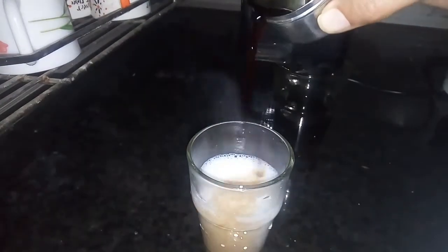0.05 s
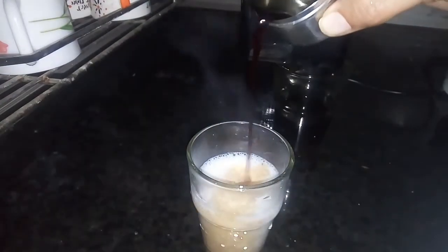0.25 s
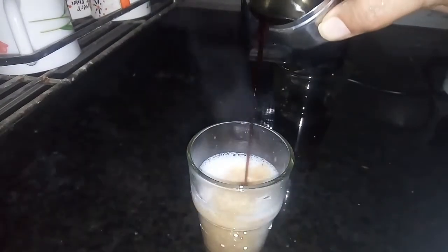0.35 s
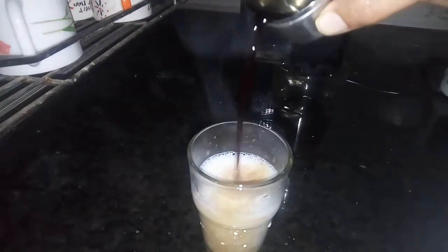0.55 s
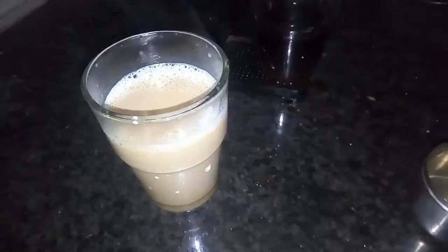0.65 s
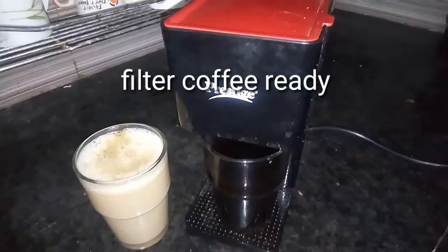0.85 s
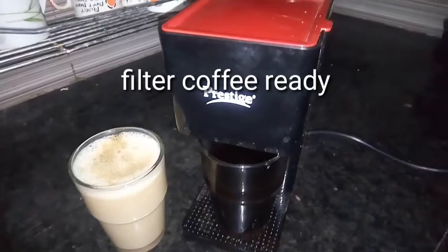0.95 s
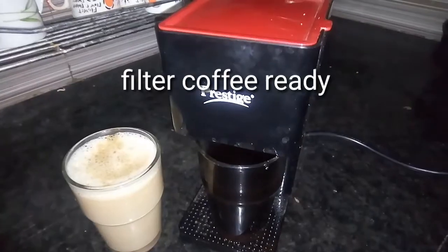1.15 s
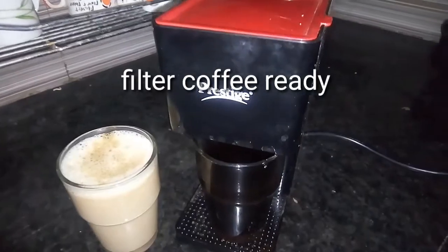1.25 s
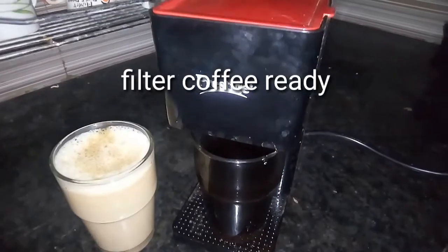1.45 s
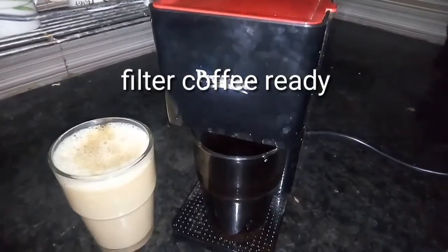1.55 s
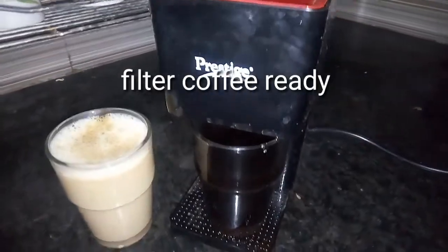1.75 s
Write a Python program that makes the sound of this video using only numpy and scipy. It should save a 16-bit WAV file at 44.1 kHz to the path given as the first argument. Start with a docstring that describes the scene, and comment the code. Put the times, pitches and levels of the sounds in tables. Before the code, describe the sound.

Coffee pours in a thin stream into a glass of milk, close and to the right, with splashing drops, bubbly plinks and a hollow gurgle. The sharpest plink comes at 0.5 seconds. At about 0.9 seconds the pour cuts off abruptly. The quiet kitchen holds a faint appliance hum while a small bird chirps softly outside. Near 1.7 seconds come one distant crow caw and a slight handling rumble.

```python
"""Coffee poured into milk

A thin stream of coffee falls into a glass of milk on a kitchen counter, close to the right microphone.
Drops slap the surface and trap bubbles, which ring the air in the glass and the kitchen. The pour cuts
off abruptly, leaving a faint appliance hum, a small bird chirping outside and one hoarse, far crow."""
import sys
import numpy as np
from scipy import signal
from scipy.fft import rfft, irfft
from scipy.io import wavfile
from scipy.ndimage import uniform_filter1d

SR = 44100
rng = np.random.default_rng(int(sys.argv[2]) if len(sys.argv) > 2 else 0)


def bounce(signal):
    """Save signal as a 16-bit WAV file at the path given by the first command-line argument."""
    frames = np.transpose(np.atleast_2d(signal))
    limited = np.clip(frames, -1, 1)
    pcm = np.round(limited * 32767).astype(np.int16)
    wavfile.write(sys.argv[1], SR, pcm)


N = 79380
TIME = np.arange(N) / SR
CUT_S = .865  # the pour stops here


def undb(db):
    """Decibels to gain."""
    return 10 ** (np.asarray(db, float) / 20)


def unit(x):
    """Scale to rms 1."""
    return x / np.sqrt(np.mean(x ** 2))


def curve(rows):
    """A fader move: gain over time through (seconds, dB) points."""
    return undb(np.interp(TIME, *np.array(rows).T))


def colour(x, points):
    """A minimum-phase EQ through (Hz, dB) points."""
    size = 2 * N
    hz, db = np.array(points, float).T
    freqs = np.maximum(np.arange(N + 1) * SR / size, 1)
    gain = undb(np.interp(np.log(freqs), np.log(hz), db))
    cepstrum = irfft(np.log(gain))
    cepstrum[1:N] *= 2  # folded forward, so nothing rings ahead of a hit
    cepstrum[N + 1:] = 0
    return irfft(rfft(x, size) * np.exp(rfft(cepstrum)))[..., :N]


def band(x, hz, width):
    """One broad resonance, at rms 1."""
    edges = [hz - width / 2, hz + width / 2]
    return unit(signal.sosfilt(signal.butter(2, edges, "bandpass", fs=SR, output="sos"), x))


def fade(t, t60):
    """Exponential decay, 60 dB down at t60."""
    return np.exp(-np.log(1000) * t / t60)


def convolve(x, response):
    """Play x through an impulse response."""
    return signal.fftconvolve(x, response)[:N]


def tail(t60):
    """Diffuse echoes of unit energy."""
    echoes = rng.standard_normal(N) * fade(TIME, t60) * (1 - np.exp(-TIME / .0029))
    return echoes / np.sqrt(np.sum(echoes ** 2))


def add(out, start, sound):
    """Mix a sound in at its start in seconds."""
    i = int(np.clip(start * SR, 0, N - 1))
    out[i:i + len(sound)] += sound[:N - i]


def wander(per_s):
    """Smooth random drift at rms 1."""
    hold = int(SR / per_s)
    steps = np.repeat(rng.standard_normal(N // hold + 1), hold)
    return unit(uniform_filter1d(uniform_filter1d(steps, hold), hold)[:N])


# EQ of the room tone. Each row: frequency in Hz, gain in dB.
ROOM_TONE_EQ = [(25, -22), (45, -7), (85, 3), (170, -6.5), (350, -5), (560, -10.5), (850, -12),
                (1300, -20.5), (2000, -21), (3900, -25), (5800, -26), (8000, -33), (13500, -36),
                (15400, -32.5)]


def room_tone():
    """A soft bed of noise, narrower in stereo below about 700 Hz."""
    mid, side = unit(colour(rng.standard_normal((2, N)), ROOM_TONE_EQ))
    side = side - .61 * signal.sosfilt(signal.butter(1, 701.5, fs=SR, output="sos"), side)
    level = undb(-75) * curve([(0, -1), (.8, 0), (.9, 2), (1.2, 2.5), (1.8, 2)])
    return level * np.array([mid + side, mid - side])


# Fader of the low room noise. Each row: time in seconds, level in dB.
DRONE_FADER = [(0, -85), (.8, -85), (.88, -72), (1., -76), (1.08, -90), (1.8, -100)]


def drone():
    """A low band of room noise that swells briefly as the pour ends."""
    sides = [band(rng.standard_normal(N), hz=390, width=250) for _ in range(2)]
    return np.array(sides) * curve(DRONE_FADER)


# Tones of the appliance. Each row: pitch in Hz, level in dB before the fader.
HUM_TONES = [(100, -85), (255, -93), (298, -83.5), (376, -84), (555, -90), (615, -86)]
# The tones grow as the microphone nears the appliance. Each row: time in seconds, gain in dB.
HUM_FADER = [(0, -17.5), (.85, -9.5), (1.05, 0), (1.8, -3)]


def appliance_hum():
    """Wavering tones over a deep mains hum and a motor note, a touch to the right."""
    def tone(hz):
        phase = 2 * np.pi * np.cumsum(hz + .56 * wander(8)) / SR
        return np.sqrt(2) * np.sin(phase) * undb(2 * wander(3.7))

    tones = curve(HUM_FADER) * sum(undb(db) * tone(hz) for hz, db in HUM_TONES)
    mains = tone(hz=49.8) * curve([(0, -83), (.75, -79.5), (.85, -70.5), (1, -68),
                                   (1.08, -80.5), (1.8, -76)])
    motor = tone(hz=81) * curve([(0, -92.5), (1, -93.5), (1.1, -76), (1.35, -80.5),
                                 (1.5, -80.5), (1.65, -81.5), (1.72, -71), (1.8, -80)])
    return (tones + mains + motor) * undb([[-.8], [.8]])


# Fader of the hand rumble. Each row: time in seconds, level in dB.
HANDLING_FADER = [(0, -94.5), (1.62, -94), (1.68, -73), (1.73, -70), (1.8, -76)]
# Its dull tone. Each row: frequency in Hz, gain in dB.
HANDLING_EQ = [(30, -13), (70, -4), (150, -7), (260, -3.5), (450, -24), (1500, -49)]


def handling():
    """A soft rumble as the hand holding the microphones shifts."""
    return unit(colour(rng.standard_normal(N), HANDLING_EQ)) * curve(HANDLING_FADER)


def yard(x):
    """Echoes outside smear a far sound, placed a little to the left."""
    smeared = np.array([x + convolve(x, tail(t60=.11)) for _ in range(2)])
    return smeared * undb([[1.5], [-1.5]])


# Shape of the caw. Each row: time in seconds, level in dB.
CROW_FADER = [(1.65, -94.5), (1.675, -73), (1.722, -64.5), (1.745, -68.5), (1.8, -72)]


def crow():
    """One hoarse call: rough pulses of noise in a single throat resonance."""
    pulse_hz = 132.2 * (1 + .04 * wander(44))
    pulses = 1 + .95 * np.sin(2 * np.pi * np.cumsum(pulse_hz) / SR)
    caw = band(rng.standard_normal(N) * pulses, hz=1454, width=290)
    return yard(caw * curve(CROW_FADER))


# The bird's phrase. Each row: start in seconds, level in dB.
CHIRPS = [(0.931, -76.5), (1.034, -67.5), (1.15, -66.5), (1.265, -67.5), (1.384, -69), (1.504, -67.5),
          (1.618, -71.5), (1.739, -69)]
# Layers of every chirp. Each row: pitch in Hz, delay in seconds, length in seconds, gain in dB,
# gain of the octave above in dB, roughness as a share of the pitch.
CHIRP_VOICES = [(2290, .003, 0.025, 0, -29, 0.03), (2207, 0.015, 0.067, -4.5, -34, 0.02),
                (2990, 0.014, 0.036, -7.5, -11.5, 0.04), (2590, 0.029, 0.037, -8.5, -14, .06)]


def bird():
    """A run of like chirps, each made of overlapping, slightly rising whistles with a raspy edge."""
    out = np.zeros(N)
    for hz, delay, length, db, octave_db, roughness in CHIRP_VOICES:
        along = np.linspace(0, 1, int(length * SR))
        glide_hz = hz * (1 + .033 * (along - .5))
        rasp = 1 + roughness * wander(590)
        for start, chirp_db in CHIRPS:
            pitch = glide_hz * np.roll(rasp, -int(start * SR))[:len(along)]
            phase = 2 * np.pi * np.cumsum(pitch) / SR
            whistle = np.sin(phase) + undb(octave_db) * np.sin(2 * phase)
            add(out, start + delay, undb(chirp_db + db) * np.sin(np.pi * along) * whistle)
    return yard(out)


# EQ of the kitchen's echoes. Each row: frequency in Hz, gain in dB.
ECHO_EQ = [(300, -17), (700, 4), (1700, 4), (3000, 1), (4200, -1.5), (6500, 1.5), (8200, -3), (11000, 1.5),
           (15000, -2.5)]
# Shading of the left microphone. Each row: frequency in Hz, gain in dB.
LEFT_SHADE_EQ = [(500, -15), (1200, -15.5), (2000, -16), (2800, -13), (4000, -21.5), (8000, -25.5),
                 (14000, -8.5)]
LEFT_LAG_S = .00013
COUNTER_DB, WALLS_DB = (4, -10), (-15.5, -15)  # echo sends, left and right


def kitchen(x):
    """The counter answers at once, the walls after it; the left microphone is shaded and later."""
    send = colour(x, ECHO_EQ)
    left, right = (x + undb(db) * convolve(send, tail(t60=.022)) for db in COUNTER_DB)
    left = np.interp(TIME - LEFT_LAG_S, TIME, colour(left, LEFT_SHADE_EQ))
    walls = np.array([undb(db) * convolve(send, tail(t60=.25)) for db in WALLS_DB])
    return np.array([left, right]) + walls


BUBBLE_ATTACK_S = .00034
BUBBLE_RISE, RISE_SPREAD = .067, .09  # share of the pitch gained over one ring, and its scatter


def bubble(hz, t60, attack):
    """Trapped air rings as a damped sine that swells quickly and mostly rises in pitch."""
    t = np.arange(int(t60 * SR) + 2) / SR
    envelope = (1 - np.exp(-t / attack)) ** 2 * fade(t, t60)
    rise = BUBBLE_RISE + RISE_SPREAD * rng.uniform(-1, 1)
    return envelope / envelope.max() * np.sin(2 * np.pi * hz * t * (1 + rise * t / t60 / 2))


# Strength of the stream. Each row: time in seconds, gain in dB.
FLOW_FADER = [(0, -0.5), (.05, -22), (.1, -23), (.14, -16.5), (.2, -7), (.24, 2), (.35, -3.5), (.43, -7),
              (.53, -6.5), (.61, -7.5), (.67, -12), (.76, -3.5), (.8, -7), (.86, 3)]
# Balance of the small bubbles. Each row: pitch in Hz, gain in dB.
FIZZ_BALANCE = [(850, -12.5), (1250, -12.5), (1800, 2), (2900, -2.5), (4000, 4), (5000, -1), (7000, 1.5),
                (9500, -7.5)]
# EQ of the spray. Each row: frequency in Hz, gain in dB.
SPRAY_EQ = [(600, -14.5), (1800, 0.5), (4000, 2), (7000, -1), (9500, -8.5), (11500, -18), (13500, -15),
            (15200, -6.5)]
FIZZ_COUNT, FIZZ_DB, FIZZ_SPREAD_DB, FIZZ_RING_CYCLES = 800, -43.5, 7, 26
SPRAY_PER_S, SPRAY_DB = 260, -59


def fizz():
    """Many small bubbles of random size and fine ticks of spray, both following the stream."""
    bubbles = np.zeros(N)
    ticks = (rng.random(N) < SPRAY_PER_S / SR) * rng.standard_normal(N)
    hz, db = np.array(FIZZ_BALANCE, float).T
    for when, smallness, strength in rng.random((FIZZ_COUNT, 3)):
        pitch = hz[0] * (hz[-1] / hz[0]) ** smallness
        gain = undb(FIZZ_DB + np.interp(pitch, hz, db) + FIZZ_SPREAD_DB * (2 * strength - 1.5))
        add(bubbles, when * CUT_S, gain * bubble(pitch, FIZZ_RING_CYCLES / pitch, BUBBLE_ATTACK_S / 2))
    spray = undb(SPRAY_DB) * unit(colour(ticks, SPRAY_EQ))
    return (bubbles + spray) * curve(FLOW_FADER)


# Path of the hollow gurgle. Each row: time in seconds, pitch in Hz, level in dB.
GURGLE_PATH = [(.22, 717.6, -118), (0.241, 714, -56.5), (0.302, 702.3, -58), (0.358, 652.5, -48.5),
               (.42, 615, -50), (.46, 660.7, -54), (0.541, 741.6, -58.5), (0.601, 840, -67),
               (0.641, 980, -84), (.69, 1070, -70), (.76, 1150, -59), (.8, 1200, -61.5)]
GURGLE_PUSHES_PER_S = 330


def gurgle():
    """Random pushes ring the dent that the stream makes in the milk; its pitch sinks, then rises."""
    times, hz, db = np.array(GURGLE_PATH).T
    pushes = (rng.random(N) < GURGLE_PUSHES_PER_S / SR) * np.exp(2j * np.pi * rng.random(N))
    envelope = fade(TIME, t60=.032) * (1 - np.exp(-TIME / BUBBLE_ATTACK_S / 2))
    phase = 2 * np.pi * np.cumsum(np.interp(TIME, times, hz)) / SR
    ring = np.real(convolve(pushes, envelope) * np.exp(1j * phase))
    return unit(ring) * undb(np.interp(TIME, times, db))


# Resonances of the glass. Each row: pitch in Hz, gain in dB, ring time (t60) in seconds.
GLASS_MODES = [(633, -13, 0.072), (1118, -22.5, 0.053), (1279, -12.5, 0.13), (1642, -2.5, 0.054),
               (2060, -3, 0.04), (2615, -16, 0.024), (3280, -24, 0.27), (3465, -20, .07),
               (3724, -17.5, 0.085), (4000, -23.5, 0.058)]


def glass(drive):
    """The air in the glass and its wall ring as damped sines when pushed."""
    modes = (undb(db) * fade(TIME, t60) * np.sin(2 * np.pi * hz * TIME) for hz, db, t60 in GLASS_MODES)
    return convolve(drive, sum(modes) / 2)


# Drops hitting the milk. Each row: start in seconds, slap level in dB, push on the glass's air in dB.
DROPS = [(0.1494, -29, -40), (0.1562, -34, -51), (0.1745, -32, -62), (.2068, -33.5, -46.5),
         (0.2142, -27, -47), (0.2318, -30.5, -30), (.2444, -30.5, -32.5), (0.261, -27.5, -37.5),
         (0.2713, -27.5, -44.5), (.2975, -37, -41), (0.3083, -34.5, -37.5), (0.3177, -35, -40),
         (0.3431, -32, -36), (0.362, -28.5, -36.5), (0.3748, -35.5, -39), (.389, -36.5, -40.5),
         (0.3986, -34, -29), (0.4381, -38.5, -37), (0.4495, -22, -25), (.5002, -34, -28.5),
         (0.5193, -28.5, -39), (0.537, -27, -37.5), (.566, -35, -34), (.576, -74, -50),
         (0.6016, -43.5, -44.5), (0.6299, -40, -48), (.644, -47.5, -63), (0.7124, -40, -79),
         (0.8102, -30.5, -32.5), (.821, -47, -34.5), (0.856, -44.5, -32.5)]
# EQ of the slaps. Each row: frequency in Hz, gain in dB.
SLAP_EQ = [(400, -28), (1200, -6.5), (3000, 2), (4500, 0.5), (6800, 6), (9000, -4), (11000, -14),
           (13000, -15.5), (15000, -11.5)]
SLAP_DECAY_S, DROPLETS_DECAY_S, DROPLETS_DB = .00032, .0096, -16


def drops():
    """Each drop gives a sharp slap with a tail of droplets falling back, and a push on the air."""
    slaps, pushes = np.zeros((2, N))
    t = TIME[:1024]
    splash = np.exp(-t / SLAP_DECAY_S) + undb(DROPLETS_DB) * np.exp(-t / DROPLETS_DECAY_S)
    for start, slap_db, push_db in DROPS:
        add(slaps, start, undb(slap_db) * splash * rng.standard_normal(len(splash)))
        add(pushes, start, undb([push_db]))
    return colour(slaps, SLAP_EQ), pushes


# Distinct plinks of bubbles trapped by the stream.
# Each row: start in seconds, pitch in Hz, peak level in dB, ring time (t60) in seconds.
PLINKS = [(.0058, 7600, -25, 0.0021), (.0062, 8340, -33, 0.0046), (.0086, 7300, -31, 0.0037),
          (.017, 2720, -50, 0.012), (.105, 3970, -44, 0.0079), (0.1221, 3850, -44.5, 0.018),
          (0.1306, 4120, -32, 0.0023), (0.1503, 4520, -25, 0.0027), (0.1492, 2130, -29, 0.0075),
          (0.199, 6060, -34, 0.008), (0.2141, 2520, -22, 0.0047), (0.2299, 984, -27.5, 0.011),
          (0.2317, 696, -35, 0.014), (0.2312, 2020, -22.5, 0.0076), (0.2335, 1244, -33, 0.07),
          (0.2437, 2050, -25, 0.016), (.2575, 2030, -29, 0.0044), (0.2594, 3200, -25, 0.0027),
          (.2625, 2060, -28.5, 0.011), (0.2686, 1644, -33.5, 0.046), (0.289, 3830, -32, 0.0091),
          (0.295, 1237, -35.5, 0.052), (.308, 1940, -30, 0.014), (0.3174, 3930, -26, .009),
          (.3335, 1940, -33, 0.012), (.337, 3800, -35, 0.012), (0.344, 7100, -43.5, .008),
          (.363, 5680, -31, 0.0052), (0.3632, 1707, -35, .025), (.383, 2210, -31.5, 0.011),
          (0.3882, 1630, -40, .025), (0.4003, 1310, -36.5, 0.036), (0.4171, 1430, -40, 0.012),
          (0.4501, 6650, -25.5, 0.0052), (.4505, 7870, -25.5, 0.0027), (.4528, 6450, -25.5, 0.0027),
          (.451, 1730, -40.5, .02), (0.458, 1260, -37.5, 0.024), (.461, 2900, -34.5, .012),
          (.483, 2080, -39, 0.0063), (0.492, 4108, -32.5, 0.013), (0.4999, 3850, -10.5, 0.013),
          (0.4995, 1986, -17, 0.014), (.5052, 4300, -47, .008), (.5196, 1930, -38.5, 0.0088),
          (0.5378, 3600, -22, 0.0042), (.5377, 5800, -30.5, 0.0076), (.566, 3820, -25.5, 0.0059),
          (.566, 1670, -34.5, .02), (0.5709, 3740, -25, 0.0063), (0.5767, 3860, -27, 0.0078),
          (0.5752, 1694, -34, 0.014), (.644, 2270, -36, 0.011), (.6615, 1950, -36.5, 0.014),
          (0.6798, 1896, -31.5, 0.019), (.682, 1100, -54, .03), (.688, 3570, -37, 0.011),
          (.696, 4300, -31, 0.0075), (.7137, 2540, -38, 0.01), (0.713, 1775, -41.5, .015),
          (0.7156, 5740, -45, 0.013), (.715, 1272, -45.5, 0.047), (.7302, 1670, -44.5, 0.045),
          (0.7386, 3910, -27, 0.0034), (.745, 1940, -35, 0.0059), (.756, 2002, -34.5, 0.018),
          (.758, 1290, -41, 0.048), (.771, 3800, -29.5, 0.005), (0.777, 2675, -38.5, 0.019),
          (0.808, 1281, -35.5, 0.084), (.8102, 6750, -36.5, .005), (.8105, 660, -50, 0.049),
          (0.8397, 3200, -39, .016), (0.858, 1664, -40.5, 0.05), (0.8576, 650, -47.5, .04)]
BUBBLES_TO_GLASS_DB, LOW_CUT_HZ = -43.5, 590


def pour():
    """Bubbles and drops sound directly and ring the glass; so small a source radiates little bass."""
    bubbles = fizz()
    for start, hz, db, t60 in PLINKS:
        add(bubbles, start, undb(db) * bubble(hz, t60, BUBBLE_ATTACK_S))
    slaps, pushes = drops()
    sound = bubbles + gurgle() + slaps + glass(pushes + undb(BUBBLES_TO_GLASS_DB) * bubbles)
    return signal.sosfilt(signal.butter(6, LOW_CUT_HZ, "highpass", fs=SR, output="sos"), sound)


def scene():
    """The pour and its echoes stop on a hard cut; the quiet kitchen and the birds carry on."""
    gate = np.clip((CUT_S - TIME) / .00085, 0, 1)
    coffee = kitchen(pour()) * gate
    return coffee + bird() + crow() + appliance_hum() + room_tone() + drone() + handling()


def record(dry):
    """A steep low-pass takes off the very top."""
    return signal.sosfilt(signal.ellip(10, .2, 70, 15650, fs=SR, output="sos"), dry)


dry = scene()
out = record(dry)
bounce(out)
```